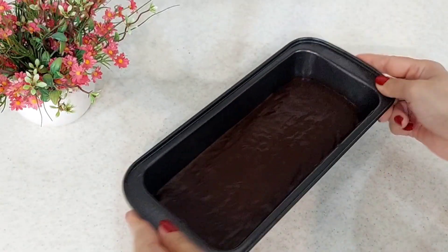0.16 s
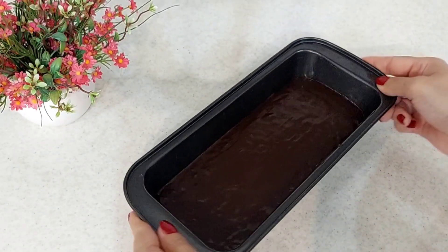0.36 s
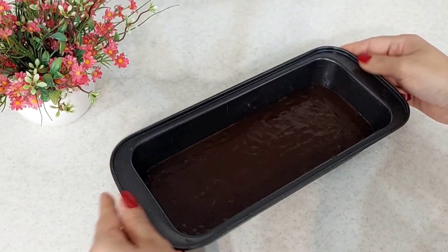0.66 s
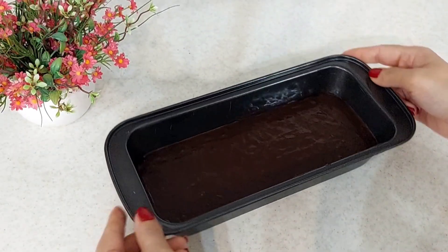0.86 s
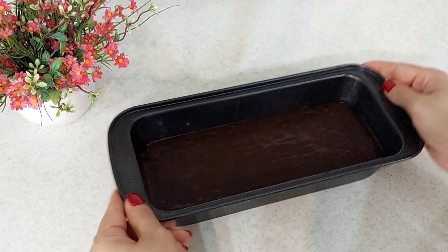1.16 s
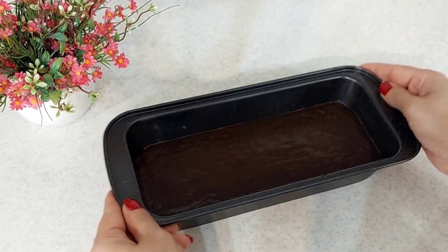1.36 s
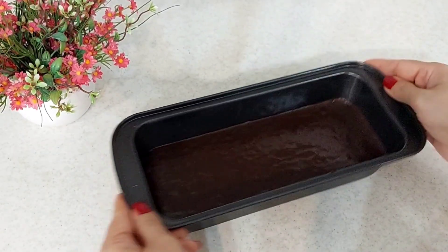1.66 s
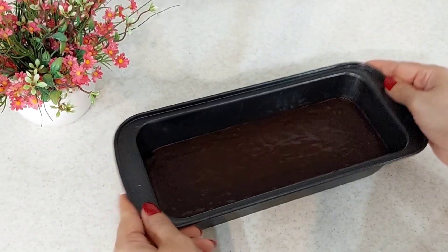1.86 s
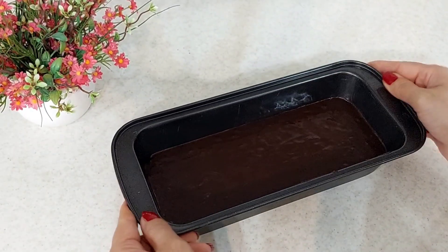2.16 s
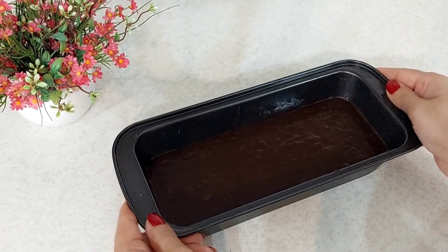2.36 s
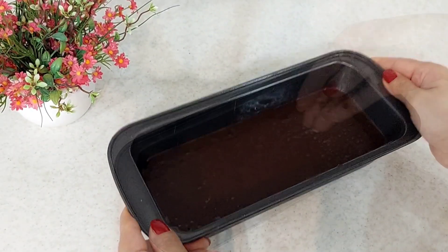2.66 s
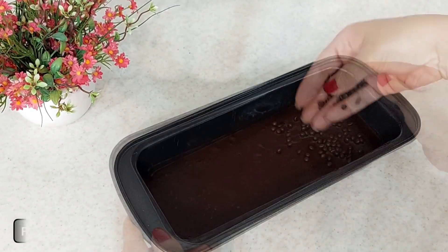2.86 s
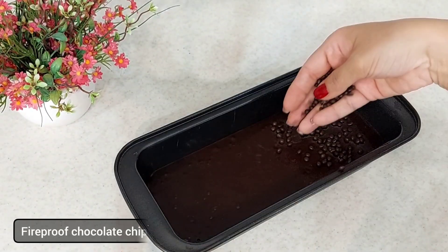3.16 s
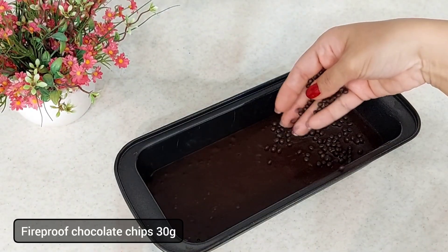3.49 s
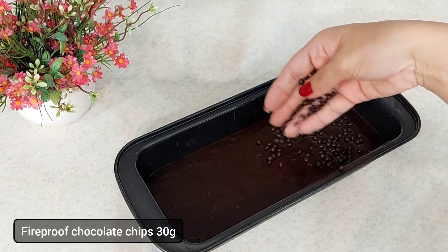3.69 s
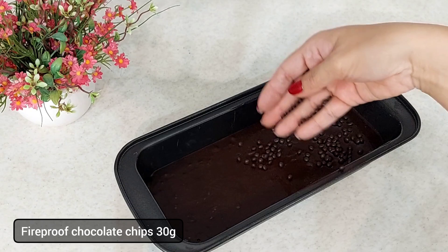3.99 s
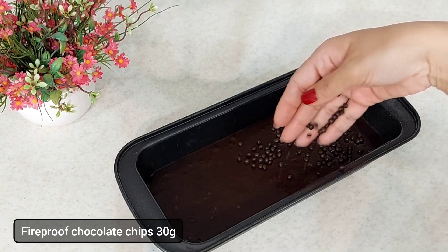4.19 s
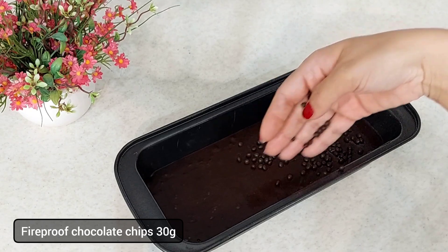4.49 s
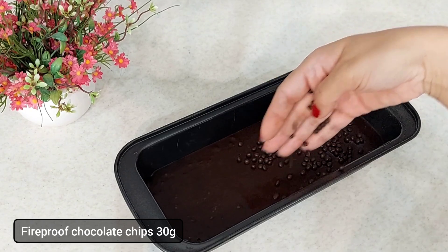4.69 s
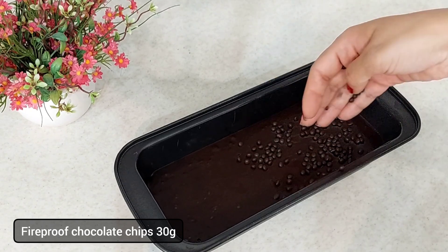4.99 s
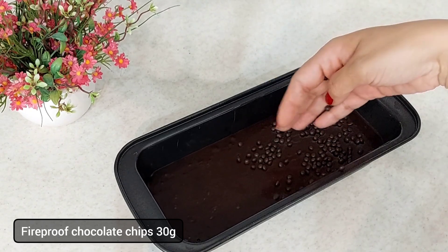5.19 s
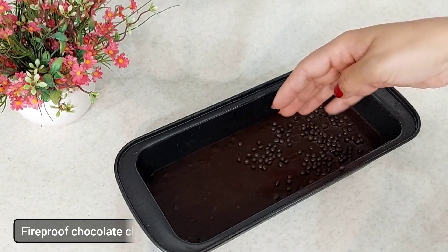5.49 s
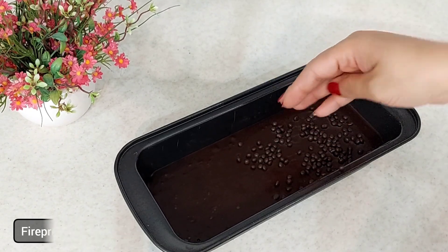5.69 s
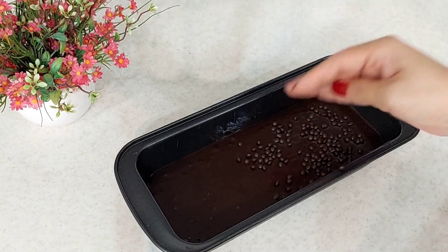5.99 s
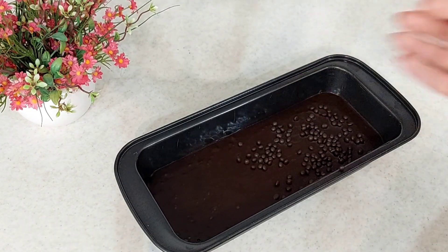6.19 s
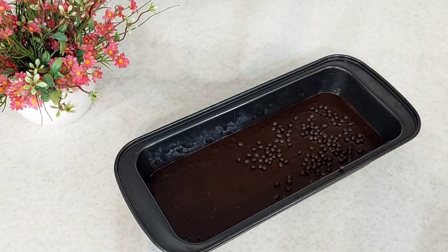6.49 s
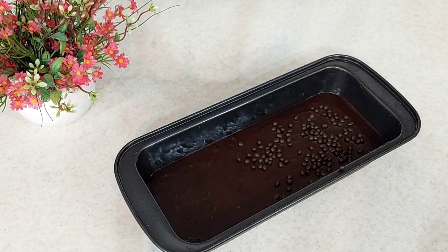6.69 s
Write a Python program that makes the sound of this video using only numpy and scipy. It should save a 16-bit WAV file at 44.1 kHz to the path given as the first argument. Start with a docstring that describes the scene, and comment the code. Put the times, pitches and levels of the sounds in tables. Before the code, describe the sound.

A close microphone in a small live kitchen picks up low hum and soft air noise throughout. From 0 to 0.45 s a batter-filled metal pan slides quietly to and fro, with low judder and a soft bump near 0.2. Faint nail ticks and a tiny squeak fill 0.5-0.9. Stronger rubbing strokes return from 1.0 to 2.1, gritty and uneven, with dull bumps around 1.25 and 1.6-1.9. After near quiet, a loud hollow metallic knock clatters at 2.75, settling quickly; a second, lesser knock follows at 3.15. Chips tick around them, clearest at 3.0, then trickle lightly. A sharp tick comes at 4.2 and a bright cluster at 4.45-4.6, with brief metallic pings. A barely audible thin whistle passes near 4.0. Sparse clicks continue to about 5.85, soft swishes brush by from 5.65, and a short hiss rises at 6.8, cut off by the end.

```python
"""A metal loaf pan of batter slides to and fro on a counter: stick-slip noise, soft bumps, squeaks and nail ticks.
Two hard knocks follow, edge after edge: each contact flexes the base, rings decaying modes and thumps the counter.
Chocolate chips start dropping around the knocks, then trickle from a hand: snaps and rattles of filtered noise,
with ringing modes at the pan's wall, a faint whistle, soft swishes, and a short hiss rising at the very end.
All through, a low hum and air noise fill a small live room, heard from close by."""
import sys
import numpy as np
from scipy import signal
from scipy.fft import rfft, irfft, next_fast_len
from scipy.io import wavfile

SR = 44100
rng = np.random.default_rng(int(sys.argv[2]) if len(sys.argv) > 2 else 0)


def int16_out(signal):
    """Quantize to a 16-bit WAV file."""
    q = np.round(np.clip(np.atleast_2d(signal).T, -1, 1) * 32767)
    wavfile.write(sys.argv[1], SR, q.astype(np.int16))


N = 302085
TIME = np.arange(N) / SR   # s

# In every noise colour the level is relative, per Hz of bandwidth.

# Pan base meeting the counter: soft bumps while sliding, two knocks that settle, a last faint nudge
# [t/s, force level/dB, flex f/Hz, clatter level/dB, counter thump level/dB]
CONTACTS = [(0.187, -46.5, 340, -75, -40), (1.095, -75, 302, -82, -45), (1.236, -39, 390, -56, -54),
            (1.253, -44, 388, -66, -39), (1.302, -45, 283, -68, -51), (1.404, -53, 303, -80, -44.5),
            (1.607, -37.5, 413, -51, -61), (1.623, -38.5, 300, -72, -36.5), (1.653, -47, 258, -64, -44.5),
            (1.768, -42.5, 368, -59, -43), (1.802, -43, 313, -74, -61), (1.822, -45, 310, -70, -42.5),
            (1.922, -42.5, 440, -56.5, -47), (2.7548, -7.5, 618, -17, -36), (2.7615, -6, 460, -25.5, -22),
            (2.768, -19, 950, -38, -49.5), (2.7727, -14, 330, -39, -38), (2.7765, -16.5, 560, -37, -49),
            (2.784, -26, 800, -40, -55), (2.8054, -24, 393, -44.5, -46), (2.838, -26.5, 540, -45, -60),
            (2.856, -31.5, 370, -54, -54), (2.874, -36, 500, -51, -42), (2.892, -37, 327, -53, -44),
            (2.923, -37, 380, -65, -53), (2.945, -46, 370, -63, -67), (3.1494, -17, 715, -27.5, -62),
            (3.1541, -16.5, 338, -31, -37.5), (3.1605, -19.5, 530, -34.5, -20),
            (3.169, -21, 340, -45, -39.5), (3.177, -32.5, 640, -48.5, -49.5), (3.198, -38, 542, -58, -49),
            (3.208, -31, 333, -56, -34), (3.255, -41, 330, -59, -53), (4.497, -68, 260, -85, -50)]
# Where the flexing base radiates [f/Hz, left-right level/dB]
FLEX_BALANCE = [(300, 0.5), (400, 0), (550, -4.5), (750, 1)]
# Ringing of the pan, damped by its batter [f/Hz, level/dB, t60/s, left-right level/dB]
PAN_MODES = [(255, -23, .17, -1.5), (305, -21.5, 0.2, 0), (357, -8.5, .12, -2), (377.3, -11.5, .12, 2.5),
             (405, -22.5, 0.04, -0.5), (541.5, -10, .13, -1.5), (626, -16.5, 0.04, 0.5),
             (748.7, -16.5, 0.08, 2), (838.6, -20, 0.092, 0.5), (925, -23.5, .19, 3.5), (980, -6, 0.071, 1),
             (1155, -25, .17, -0.5), (1438, -21.5, 0.12, 1.5), (1433, -21, 0.1011, 0),
             (1868, -23.5, 0.082, -3), (2310, -29.5, 0.0807, -1)]
# Dense, quickly dying modes of the sheet metal [f/Hz, level/dB]
CLATTER_COLOUR = [(170, -10), (300, -3.5), (600, 8.5), (1000, 0.5), (1500, -4), (2500, -18.5),
                  (3600, -15.5), (5400, -20), (7400, -16.5), (9500, -29), (13000, -23), (16000, -34)]
# Crowd of weaker wall modes that outlasts the clatter [f/Hz, level/dB]
BODY_COLOUR = [(300, 0.5), (380, 0), (550, 0), (950, -0.5), (1500, -10), (2400, -17.5)]
FLEX_CYCLES = 11.05   # swings until the flexing is 60 dB down
COUNTER_RISE_S, FLEX_RISE_S = 0.0033, 0.00059   # the heavy counter takes longer to start moving
# Levels relative to the force; quicker contacts ring the modes more
RINGING_DB, CONTACT_HZ, RINGING_DB_PER_OCTAVE = -11, 512, 4.5
BODY_DB, BODY_T60 = -28, 0.24
BATTER_HZ, BATTER_DB, BATTER_T60 = 144.73, -28, 0.063   # the heavy filling bounces on the base
COUNTER_HZ, COUNTER_T60 = 107.3, 0.1
CRACK_DB, CRACK_T60 = -15, 0.0074   # metal meeting the counter, relative to the clatter
PORT_LAG_S = 0.00013   # the right microphone port hears the pan first

# Hollow under the base, changing pitch as the pan tilts
# [start t/s, length/s, first f/Hz, last f/Hz, level/dB]
TILTS = [(1.289, 0.11, 230, 682, -63), (1.498, 0.046, 367, 500, -60), (1.636, 0.054, 389, 222, -57),
         (2.779, 0.062, 249, 602, -34)]
TILT_ROUGH, TILT_FLUTTER_PER_S = 0.46, 170

# Strokes to and fro that level the batter [t/s at top speed, speed level/dB]
STROKES = [(.005, 0), (.098, -4), (.18, 2), (.275, -6), (.352, -6), (.44, -7), (1.04, 10), (1.145, 10.5),
           (1.25, 5.5), (1.342, 3.5), (1.435, 6.5), (1.53, 5.5), (1.615, -7), (1.697, 7.5), (1.775, -4),
           (1.855, -9), (1.935, -3), (2.022, -6)]
# How hard the base is pushed over the counter [t/s, level/dB]
PUSH = [(0, 2), (.2, -1), (.34, -1), (.48, -13.5), (.58, -13), (.96, -13), (1.04, -5.5), (1.17, -6),
        (1.26, 3), (1.33, 0.5), (1.49, -5.5), (1.64, -1), (2.04, 0), (2.11, -9.5), (2.5, -18)]
# Crumbs of grit dragged under the base [t/s at the height of the scuff, level/dB, half length/s]
SCUFFS = [(0.184, -73, 0.0048), (1.191, -63, 0.0086), (1.245, -63.5, 0.029), (1.377, -56, 0.0056),
          (1.546, -55, 0.0048), (1.689, -68, 0.0017), (1.7, -59.5, 0.0092), (1.856, -66, 0.011)]
# Three noise colours of the sliding base [f/Hz, level/dB]
JUDDER_COLOUR = [(35, -17), (60, -6.5), (102, -1), (172, -16.5), (304, -11), (346, -16), (380, -12.5),
                 (652, -20), (794, -18.5), (1100, -59), (1400, -27), (1820, -76), (3080, -120)]
SCRAPE_COLOUR = [(500, 7.5), (900, 4), (1500, -4), (2300, -3.5), (3300, -24), (5000, -9)]
HISS_COLOUR = [(1760, -19), (3000, -7), (3330, -16), (3860, -2.5), (5920, -2.5), (6670, 1.5), (7940, -2.5),
               (9010, -10.5), (12800, 1), (15100, -5.5), (16000, -2)]
STROKE_S = 0.082   # length of one stroke
TURN_SPEED = 0.54   # share of a 0 dB stroke's top speed that is left at the turns
SCUFF_HISS_DB = -14   # hiss of a scuff relative to its scrape

# Fingers squeaking briefly on the rim [t/s, f/Hz, level/dB, length/s, width as a share of the pitch]
SQUEAKS = [(0.688, 2630, -69, 0.023, 0.27), (0.717, 2760, -83.5, 0.13, .22),
           (2.209, 1800, -69, 0.057, 0.97), (2.228, 2470, -77.5, 0.13, .13)]
# Fingernails ticking on the rim [t/s, level/dB]
NAILS = [(0.507, -66), (0.587, -69), (0.7, -57), (0.736, -61), (0.778, -61.5), (0.809, -65), (0.86, -65),
         (2.5586, -58)]

# The clearest chips to drop [t/s, level/dB, left-right level/dB]
CLEAR_CHIPS = [(2.899, -63, 2), (2.915, -53.5, -1), (3.0028, -31.5, 5), (3.039, -35.5, 0),
               (3.1056, -53.5, 1), (3.178, -50, 1), (3.216, -54.5, -1), (3.3345, -52.5, -3),
               (3.3468, -50.5, 1), (3.4927, -66, -2), (3.5506, -61, 0), (3.583, -55.5, -2),
               (3.592, -54, -3), (3.6996, -60, 1), (3.7622, -61.5, -5), (3.7778, -49, -0.5),
               (3.8018, -51.5, 0), (3.8084, -49.5, 0.5), (3.84, -60, -1), (3.9257, -61, -1),
               (3.942, -59, 0.5), (3.967, -50, -3.5), (3.9842, -48.5, -3), (4.02, -46.5, -1),
               (4.1904, -33.5, -1.5), (4.309, -54, -2), (4.339, -55.5, 3), (4.365, -61, -4),
               (4.403, -48.5, 0), (4.4452, -52, 1), (4.475, -32, -5), (4.5179, -31.5, 1),
               (4.5344, -30.5, -3), (4.5574, -31, -3), (4.587, -41.5, 1), (4.807, -45, 2.5),
               (5.128, -48.5, 0), (5.213, -48.5, 2.5), (5.242, -52, -4), (5.4033, -51, -4),
               (5.4147, -47, 1), (5.433, -44.5, -2), (5.5678, -48, 1), (5.843, -51.5, 1.5)]
# Noise colours of the short snap, the chip's rattle and the pan's wall under it [f/Hz, level/dB]
SNAP_COLOUR = [(4500, -14), (6800, 5), (9500, -24), (12500, 2.5), (15000, 6), (16000, -7)]
CHIP_COLOUR = [(2800, -16), (3700, -44), (4400, -11.5), (5100, -4), (5700, -4.5), (6900, 2.5), (8200, -5),
               (9500, -8), (12000, -0.5), (14500, -8.5), (16000, -1)]
WALL_COLOUR = [(650, -4), (800, -3), (990, 2.5), (1150, -6), (1350, -2), (1600, -2), (2500, -1), (3050, -9),
               (3600, 5.5), (5500, -0.5)]
# Direct hits that leave the pan's wall singing [t/s, level/dB, most strongly excited f/Hz]
RIM_HITS = [(3.003, -52.5, 570), (3.039, -59, 1409), (4.191, -63, 1620), (4.475, -67, 3800),
            (4.518, -58, 1100), (4.535, -61, 1300), (4.5574, -57, 570)]
# Singing modes of the wall [f/Hz, level/dB, t60/s]
RIM_MODES = [(550, -5.5, 0.24), (1009.6, -9, 0.089), (1345, 1.5, 0.041), (1690, 0, 0.071), (2454, 1, 0.07),
             (3790, -5, 0.06), (4870, 14, 0.055), (7150, -12.5, .12)]
# How briskly the fingers work the chips [t/s, level/dB]
FINGERS = [(3.48, -4), (3.58, -2), (4.02, 0), (4.18, -25), (4.37, 5), (4.46, 1), (4.55, 7), (4.62, -5.5),
           (4.9, -27), (5.3, -16), (5.9, -15.5)]
SMALL_CHIPS_PER_S = 20   # at a briskness of 0 dB
SMALL_CHIP_DB, SMALL_CHIP_SPREAD_DB, SMALL_CHIP_TOP_DB = -66, 10, -61
CHIP_COLOUR_DB = 2.5   # no two chips sound alike: spread of each part of their spectrum
RIM_LOSS_DB_PER_OCTAVE = 9.5   # for modes away from the most excited one
RIM_RATTLE, RIM_RATTLE_PER_S = 1, 134   # the loose chips make the ringing waver

# Soft swishes of hiss, then a short rising hiss at the very end
# [start t/s, length/s, f/Hz, level/dB, level/dB an octave to either side]
SWISHES = [(3.633, 0.19, 3400, -75.5, -1), (3.875, 0.39, 6540, -78, -20), (5.657, 0.16, 3593, -74.5, -4),
           (6.019, 0.42, 1900, -85, -11.5), (6.051, 0.64, 6670, -75, -31.5),
           (6.653, 0.12, 5050, -76, -11.5), (6.814, 0.16, 6200, -64, -11.5)]
SWISH_RISE = 0.22   # share of the length spent swelling
SWISH_WIDTH = 1.09   # flat within this ratio of the centre

# A very faint, thin whistle that lifts, then sinks [t/s, f/Hz, level/dB]
WHISTLE = [(3.879, 7160, -81), (3.94, 7780, -88), (4.04, 6900, -80), (4.1, 6820, -79.5), (4.17, 6320, -86)]

# Echo of the small kitchen: its colour [f/Hz, level/dB] and its decay [f/Hz, t60/s]
ROOM_COLOUR = [(60, -3.5), (200, -1), (500, -3), (2000, 2.5), (5000, 1), (16000, -3.5)]
ROOM_T60 = [(80, .25), (250, 0.36), (600, 0.25), (1000, 0.25), (1800, 0.28), (4000, 0.16), (14000, 0.23)]
# Noise colours of the low air noise and the faint hiss [f/Hz, level/dB]
AIR_COLOUR = [(15, -57), (25, -30), (49, -1), (70, -3.5), (92, -11), (137, -3.5), (166, -16.5), (190, -14),
              (285, -10.5), (439, -21), (489, -20), (1100, -33.5), (6920, -45.5), (7510, -46),
              (16000, -52.5)]
AIR_TREBLE_COLOUR = [(3000, -18.5), (5200, 1), (5800, -6), (7400, 2), (8800, -11), (10800, -11.5),
                     (12500, -3), (16000, -10.5)]
AIR_DB, AIR_TREBLE_DB = -66, -79.5
HUM_HZ, HUM_DB = 69, -73   # centres of a wavering pitch and level
# How alike the two channels of any noise are [f/Hz, left-right correlation]
LIKENESS = [(60, 0.51), (250, 0.91), (500, 0.45), (1000, -0.38), (2000, 0.31), (4000, -0.14),
            (16000, 0.099)]
CUTOFF_HZ = 16000


def from_db(db):
    """Gain for a level in dB."""
    return 10 ** (np.asarray(db) / 20)


def rms_one(x):
    """Scales a signal to an rms of 1."""
    return x / np.sqrt(np.mean(x ** 2) + 1e-20)


def at_hz(points, hz):
    """Reads a table on a log-frequency axis."""
    table = np.array(points)
    return np.interp(np.log(np.maximum(hz, 1)), np.log(table[:, 0]), table[:, 1])


def panned(left_db):
    """Channel gains for a left-right difference in dB."""
    return from_db(np.array([[left_db], [-left_db]]) / 2)


def add(out, s, sound):
    """Mixes a sound in at a time in seconds."""
    i = round(s * SR)
    out[..., i:i + sound.shape[-1]] += sound[..., :N - i]


def gain_curve(rows):
    """Gain from rows of (s, dB), silent outside their span."""
    s, db = np.transpose(rows)
    return from_db(np.interp(TIME, s, db)) * (TIME >= s[0]) * (TIME <= s[-1])


def drift(rate):
    """Random wandering with spread 1: straight lines between chance values, `rate` of them a second."""
    return np.interp(TIME * rate, np.arange(4096), rng.standard_normal(4096)) * np.sqrt(3 / 2)


def noise(spectrum, size=N):
    """Stereo noise of a given colour, most alike between channels in the bass; rms 1."""
    padded = next_fast_len(size, True)
    hz = np.arange(padded // 2 + 1) * SR / padded
    mid, side = rfft(rng.standard_normal((2, padded)))
    alike = np.clip(at_hz(LIKENESS, hz), -1, 1)
    both = np.sqrt(1 + alike) * mid + np.sqrt(1 - alike) * side * [[1], [-1]]
    # roll off beyond either end of the table
    skirts = np.minimum(1, hz / spectrum[0][0]) ** 2 / np.maximum(1, hz / spectrum[-1][0]) ** 2
    return rms_one(irfft(both * skirts * from_db(at_hz(spectrum, hz)), padded)[:, :size])


def burst(spectrum, t60, size=8192):
    """Many close modes struck at once, dying together: noise with one exponential decay."""
    return noise(spectrum, size=size) * from_db(-60 * TIME[:size] / t60)


def ring(hz, t60, size=22050, lag_s=0, rise_s=1e-9):
    """One struck mode: a decaying sine with a soft onset."""
    age = np.maximum(TIME[:size] - lag_s, 0)
    return np.sin(2 * np.pi * hz * age) * from_db(-60 * age / t60) * (1 - np.exp(-age / rise_s))


def pan_blows(clatter_t60=0.043, mode_spread_db=2.5, corner_ratio=1.917):
    """Each contact flexes the base, rings the pan and thumps the counter; a slow contact misses high modes."""
    out = np.zeros((2, N))
    lags = np.array([[PORT_LAG_S], [0]])
    for s, force_db, flex_hz, clatter_db, thump_db in CONTACTS:
        flex = ring(flex_hz, FLEX_CYCLES / flex_hz, size=8192, lag_s=lags, rise_s=FLEX_RISE_S)
        add(out, s, from_db(force_db) * panned(at_hz(FLEX_BALANCE, flex_hz)) * flex)

        ringing_db = force_db + RINGING_DB + RINGING_DB_PER_OCTAVE * np.log2(flex_hz / CONTACT_HZ)
        for k, (hz, mode_db, t60, left_db) in enumerate(PAN_MODES):
            reach = 1 / np.hypot(1, (hz / (corner_ratio * flex_hz)) ** 2)
            strength = reach * from_db(ringing_db + mode_db + rng.normal(0, mode_spread_db))
            swing = (-1) ** (k + 1)   # neighbouring modes swing in opposite directions
            add(out, s, swing * strength * panned(left_db) * ring(hz, t60, size=13000, lag_s=lags))

        batter = ring(BATTER_HZ, BATTER_T60, rise_s=COUNTER_RISE_S)
        thump = ring(COUNTER_HZ, COUNTER_T60, rise_s=COUNTER_RISE_S)
        add(out, s, from_db(clatter_db) * burst(CLATTER_COLOUR, clatter_t60))
        add(out, s, from_db(force_db + BODY_DB) * burst(BODY_COLOUR, BODY_T60))
        add(out, s, from_db(force_db + BATTER_DB) * batter)
        add(out, s, from_db(thump_db) * panned(4) * thump)
        add(out, s, from_db(clatter_db + CRACK_DB) * burst(CHIP_COLOUR, CRACK_T60, size=2048))
    return out


def tilts():
    """The hollow under the base rings with a rough, gliding tone while the gap changes."""
    out = np.zeros((2, N))
    for s, length_s, first_hz, last_hz, db in TILTS:
        progress = np.minimum(TIME[:8192] / length_s, 1)
        phase = 2 * np.pi * np.cumsum(first_hz + (last_hz - first_hz) * progress) / SR
        flutter = TILT_ROUGH * drift(TILT_FLUTTER_PER_S)[:8192]
        slip = TILT_ROUGH * drift(TILT_FLUTTER_PER_S)[:8192]
        tone = (1 + flutter) * np.sin(phase) + slip * np.cos(phase)
        add(out, s, from_db(db) * np.sin(np.pi * progress) * tone)
    return out


def shake_speed():
    """Speed of the base, 1 at the height of a lone 0 dB stroke: it swells in each stroke and drops at the turns."""
    swing = 0
    for s, db in STROKES:
        stroke = np.cos(np.pi * np.clip((TIME - s) / STROKE_S, -.5, .5)) ** 2
        swing = swing + from_db(db) * stroke
    return TURN_SPEED + (1 - TURN_SPEED) * swing


def grit_catches(grains_per_s=800, size_db=4, t60=0.0093):
    """Quick, uneven catches of the base on the counter, as a gain with rms 1."""
    sizes = from_db(size_db * np.minimum(rng.exponential(1, N), 3))
    catches = (rng.random(N) < grains_per_s / SR) * sizes
    # overlapping catches add up in power
    power = signal.lfilter([1], [1, -from_db(-120 / (t60 * SR))], catches ** 2 + 1e-18)
    return rms_one(np.sqrt(power))


def sliding(judder_db=-57, scrape_db=-67, hiss_db=-66.0, judder_follows=0.2, scrape_follows=0.92,
            rough_db=1.0, scuff_judder_db=-7, hiss_grain_db=1.0):
    """The base sticks and slips: uneven grip shakes judder and hiss, grit breaks up the scrape; push drives all."""
    push, speed = gain_curve(PUSH), shake_speed()
    grip = from_db(rough_db * drift(180))
    scuffs = sum(from_db(db) / (1 + ((TIME - s) / half_s) ** 4) for s, db, half_s in SCUFFS)

    # the exponents set how closely each layer follows the speed
    judder_gain = from_db(judder_db) * push * speed ** judder_follows + from_db(scuff_judder_db) * scuffs
    scrape_gain = from_db(scrape_db) * push * speed ** scrape_follows + scuffs
    hiss_gain = from_db(hiss_db) * push * speed + from_db(SCUFF_HISS_DB) * scuffs

    judder = judder_gain * noise(JUDDER_COLOUR) * panned(3.8)
    scrape = scrape_gain * noise(SCRAPE_COLOUR)
    hiss = hiss_gain * noise(HISS_COLOUR) * from_db(hiss_grain_db * drift(590))
    return grip * (judder + hiss) + grit_catches() * scrape


def squeaks():
    """Skin slipping on the coating makes a rough tone: narrow noise in a rounded swell."""
    out = np.zeros((2, N))
    for s, hz, db, length_s, width in SQUEAKS:
        swell = np.sin(np.pi * np.minimum(TIME[:8192] / length_s, 1))
        colour = [(hz / (1 + width), -20), (hz, 0), (hz * (1 + width), -20)]
        add(out, s, from_db(db) * swell * noise(colour, size=8192))
    return out


def nails(t60=0.022):
    """Light, bright ticks of the grip shifting on the rim."""
    out = np.zeros((2, N))
    for s, db in NAILS:
        add(out, s, from_db(db) * burst(SNAP_COLOUR, t60))
    return out


def small_chips(scatter_db=2):
    """Lighter chips slip out at random, more often as the fingers work: rows like those of CLEAR_CHIPS."""
    times = TIME[rng.random(N) < SMALL_CHIPS_PER_S * gain_curve(FINGERS) / SR]
    rows = []
    for s in times:
        size, side = rng.standard_normal(2)
        db = min(SMALL_CHIP_DB + SMALL_CHIP_SPREAD_DB * size, SMALL_CHIP_TOP_DB)
        rows.append((s, db, scatter_db * side))
    return rows


def chips(click_db=-5, click_t60=0.042, snap_db=0.0, snap_t60=0.0059, hardest_snap_db=-44,
          wall_db=-15.0, wall_t60=0.063, wall_db_per_db=0.5, hard_hit_db=-33):
    """A tiny snap and a short bright rattle of its own colour; harder hits bring up the pan's wall."""
    out = np.zeros((2, N))
    for s, db, left_db in CLEAR_CHIPS + small_chips():
        # chocolate gives under a hard hit, so the snap stops growing
        snap = from_db(min(db, hardest_snap_db) + snap_db) * burst(SNAP_COLOUR, snap_t60)
        colour = [(hz, level_db + rng.normal(0, CHIP_COLOUR_DB)) for hz, level_db in CHIP_COLOUR]
        rattle = from_db(db + click_db) * burst(colour, click_t60)
        add(out, s, panned(left_db) * (snap + rattle))
        wall_hit_db = db + wall_db + wall_db_per_db * (db - hard_hit_db)
        add(out, s, from_db(wall_hit_db) * burst(WALL_COLOUR, wall_t60))
    return out


def singing_wall():
    """After a direct hit the wall's modes ring and waver, strongest near the pitch that was struck."""
    out = np.zeros((2, N))
    for s, db, struck_hz in RIM_HITS:
        waver = 1 + RIM_RATTLE * drift(RIM_RATTLE_PER_S)[:8192]
        for hz, mode_db, t60 in RIM_MODES:
            loss_db = RIM_LOSS_DB_PER_OCTAVE * abs(np.log2(hz / struck_hz))
            add(out, s, from_db(db + mode_db - loss_db) * waver * ring(hz, t60, size=8192))
    return out


def hand(rustle_db=-76, grains_per_s=55, grain_db=4, grain_t60=0.02):
    """Chips shift in the fingers with tiny uneven ticks: noise gated by random decaying grains."""
    sizes = from_db(grain_db * np.minimum(rng.exponential(1, N), 3))
    grains = (rng.random(N) < grains_per_s / SR) * sizes
    fading = signal.lfilter([1], [1, -from_db(-60 / (grain_t60 * SR))], grains + 1e-18)
    return gain_curve(FINGERS) * from_db(rustle_db) * rms_one(fading) * noise(SNAP_COLOUR)


def swishes():
    """Each swish is a smooth band of hiss that swells quickly and fades slowly; the end cuts the last one short."""
    out = np.zeros((2, N))
    for s, length_s, hz, db, skirt_db in SWISHES:
        swell = np.interp(TIME[:SR] / length_s, [0, SWISH_RISE, 1], [0, 1, 0])
        colour = [(hz / 2, skirt_db), (hz / SWISH_WIDTH, 0), (hz * SWISH_WIDTH, 0), (hz * 2, skirt_db)]
        add(out, s, from_db(db) * swell * noise(colour, size=SR))
    return out


def whistle(waver_hz=15, octave_below_db=-13):
    """A thin, slightly unsteady tone with a weaker one an octave below."""
    s, hz, db = np.transpose(WHISTLE)
    phase = 2 * np.pi * np.cumsum(np.interp(TIME, s, hz) + waver_hz * drift(200)) / SR
    tone = np.sin(phase) + from_db(octave_below_db) * np.sin(phase / 2)
    return gain_curve(np.transpose([s, db])) * tone


def room(x, delay_s=0.003375):
    """Diffuse reflections of a small kitchen: a noise tail whose bands each die at their own rate."""
    size = 26000
    white, tail = noise(ROOM_COLOUR, size=size), 0
    edges = np.geomspace(40, 18000, 10)   # Hz
    for low, high in zip(edges, edges[1:]):
        band_pass = signal.butter(2, [low, high], "band", fs=SR, output="sos")
        t60 = at_hz(ROOM_T60, np.sqrt(low * high))
        tail = tail + signal.sosfilt(band_pass, white) * from_db(-60 * TIME[:size] / t60)
        white = white[:, ::-1]   # neighbouring bands use the noise in opposite directions
    # silent up to the delay, then fading in over the same time again
    tail = tail * np.clip(TIME[:size] / delay_s - 1, 0, 1)
    return signal.fftconvolve(x, rms_one(tail) / np.sqrt(size), axes=1)[:, :N]


def room_tone(waver_db=3, wander_hz=1.3):
    """Low air noise, a faint hiss and a hum that wavers in pitch and level."""
    phase = 2 * np.pi * np.cumsum(HUM_HZ + wander_hz * drift(8.5)) / SR
    hum = from_db(HUM_DB + waver_db * drift(25)) * np.sqrt(2) * np.sin(phase)
    air = from_db(AIR_DB) * noise(AIR_COLOUR)
    treble = from_db(AIR_TREBLE_DB) * noise(AIR_TREBLE_COLOUR)
    return panned(3.35) * (hum + air) + treble


def scene(pan_room_db=-11, chip_room_db=-10):
    """Pan, chips and swishes close to the microphone, with the room behind them."""
    pan = pan_blows() + tilts() + sliding() + squeaks() + nails()
    sprinkle = chips() + singing_wall() + hand() + swishes()
    echo = room(from_db(pan_room_db) * pan + from_db(chip_room_db) * sprinkle)
    return pan + sprinkle + whistle() + echo + room_tone()


def record(dry):
    """The microphone drops the deep bass; the top is cut steeply."""
    bass_cut = signal.butter(4, 46, "high", fs=SR, output="sos")
    top_cut = signal.ellip(10, .2, 80, CUTOFF_HZ, fs=SR, output="sos")
    return signal.sosfilt(top_cut, signal.sosfilt(bass_cut, dry))


dry = scene()
out = record(dry)
int16_out(out)
```